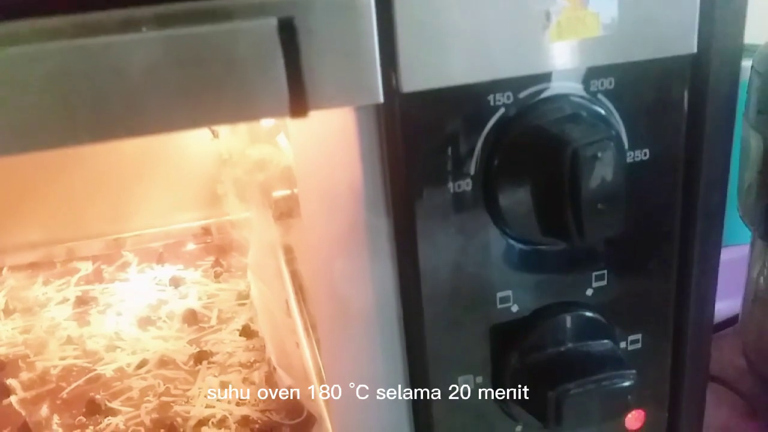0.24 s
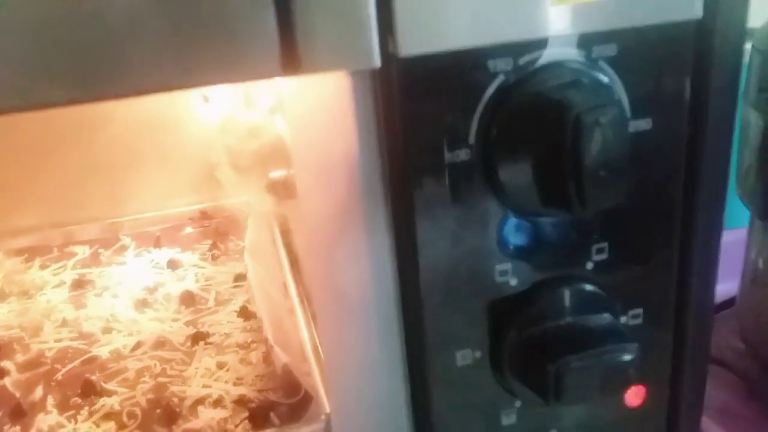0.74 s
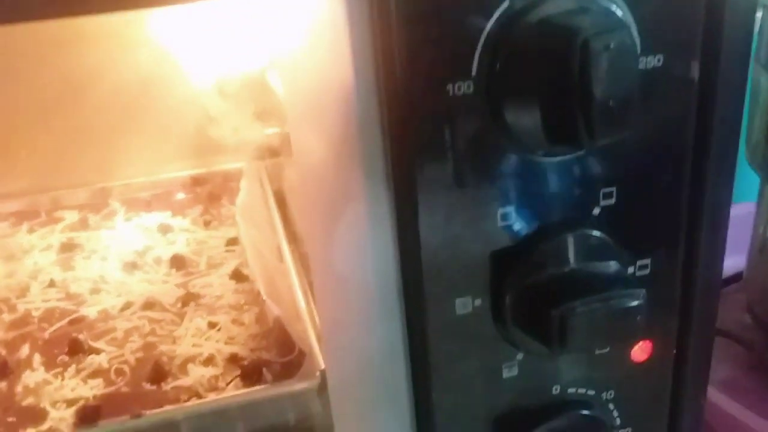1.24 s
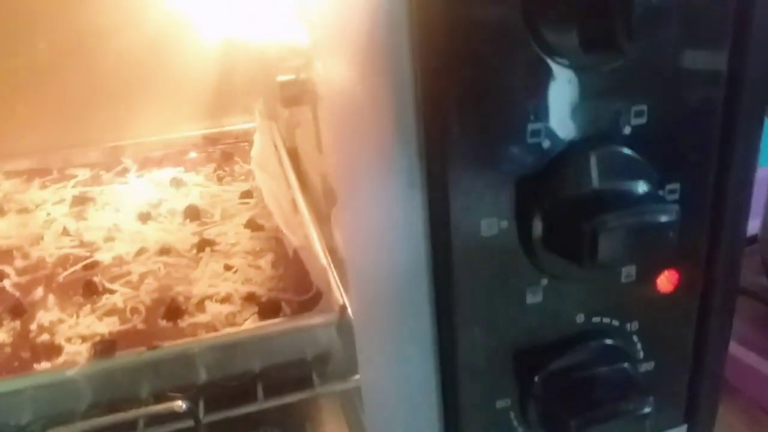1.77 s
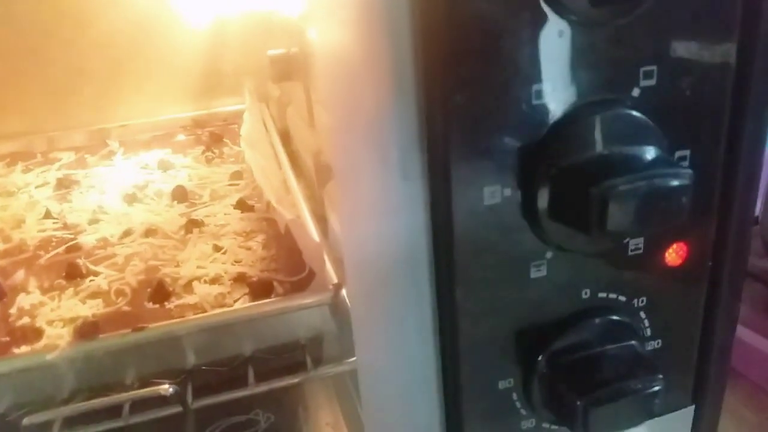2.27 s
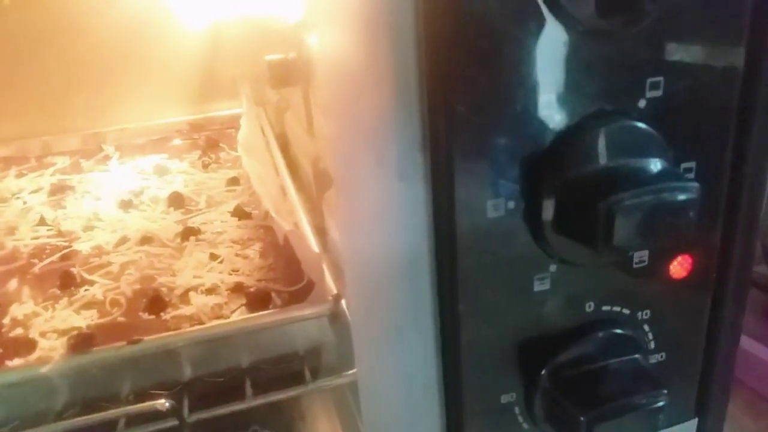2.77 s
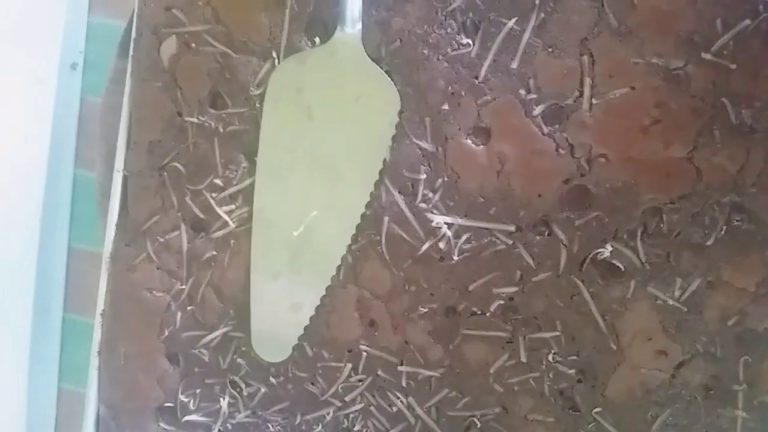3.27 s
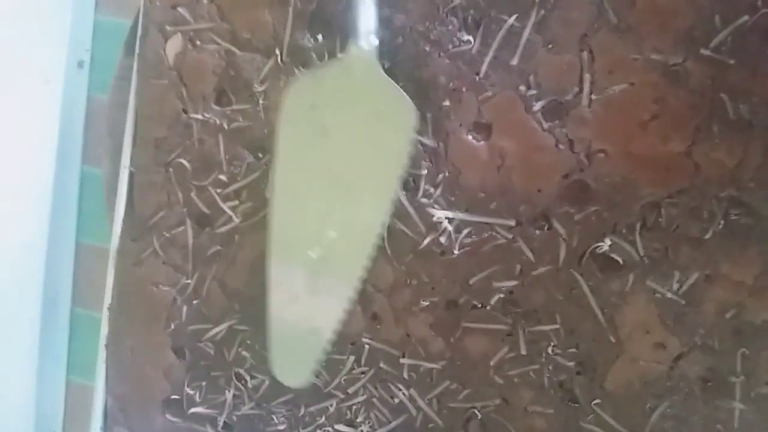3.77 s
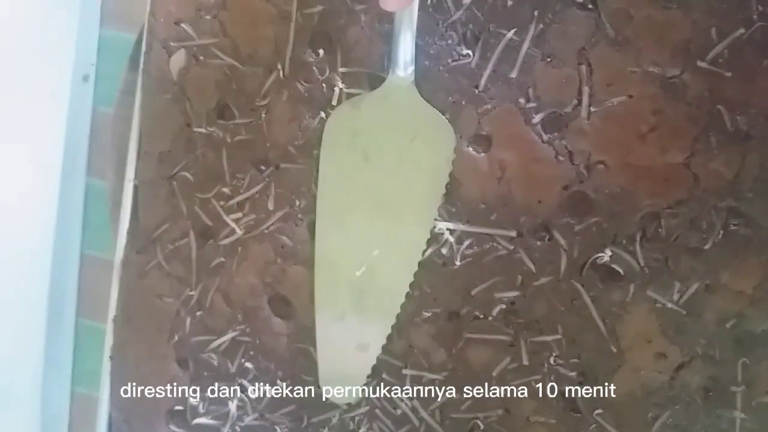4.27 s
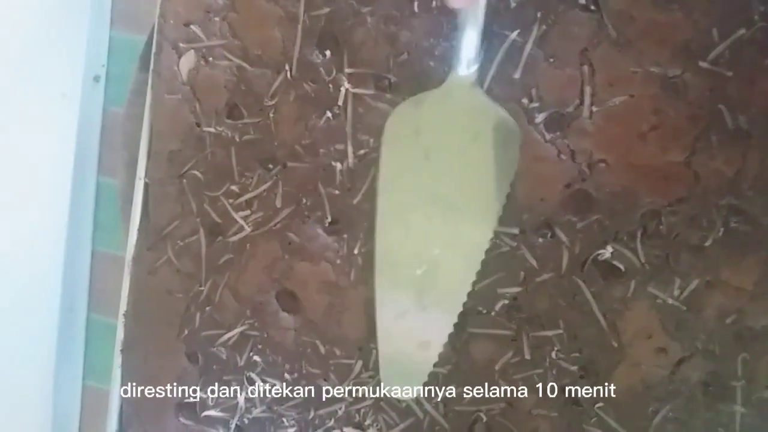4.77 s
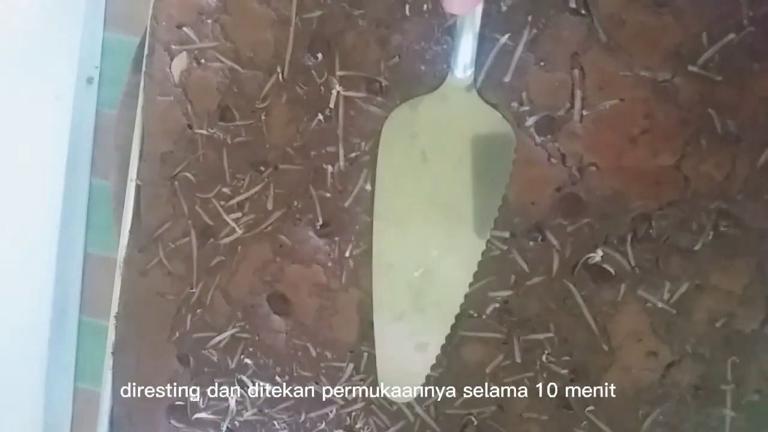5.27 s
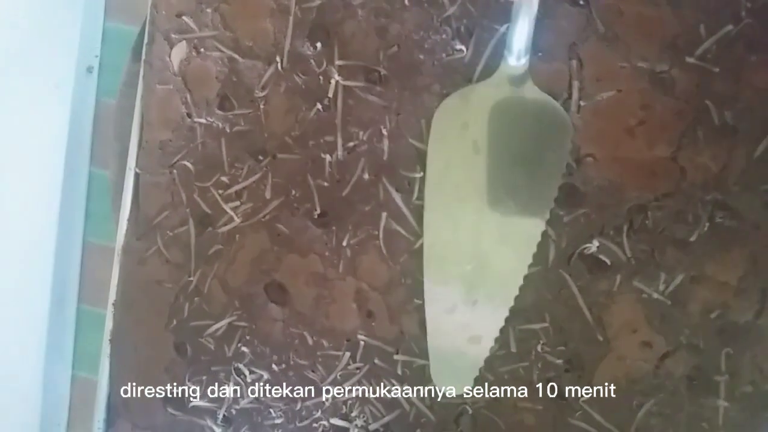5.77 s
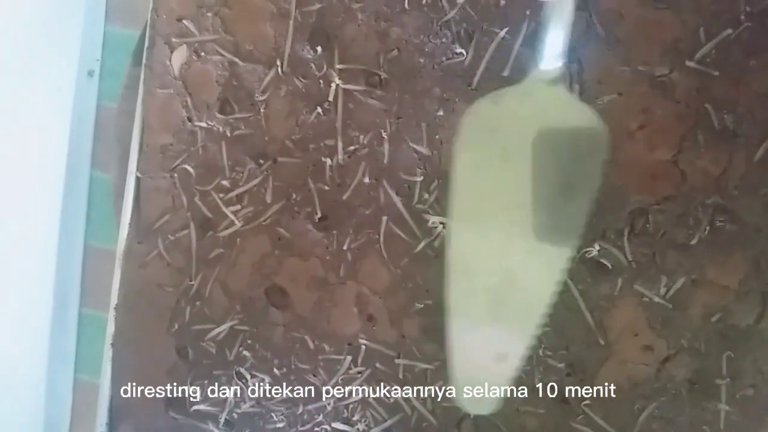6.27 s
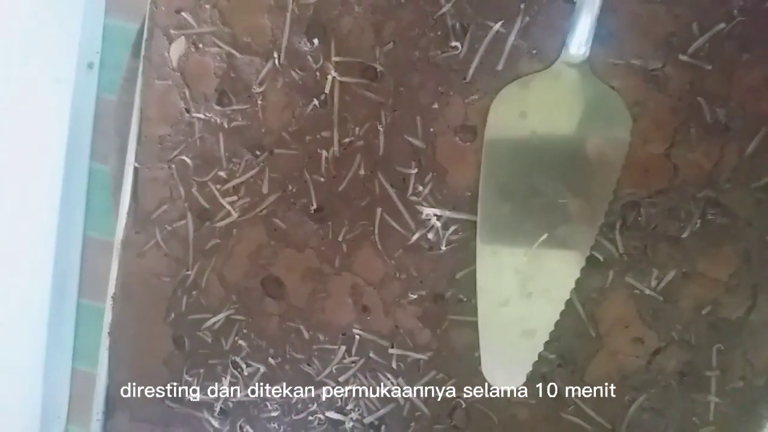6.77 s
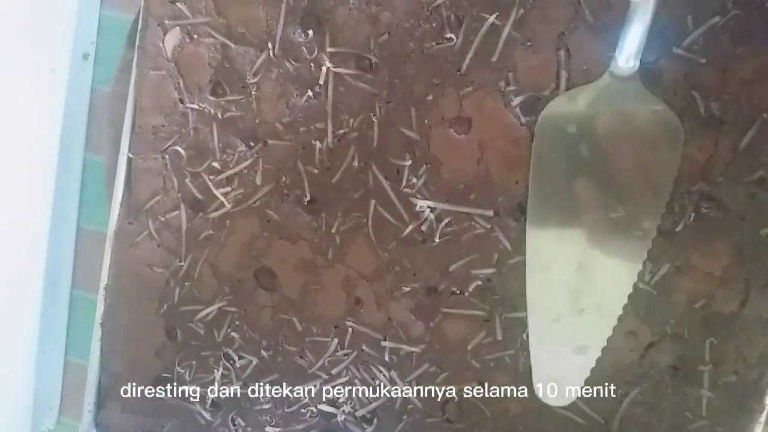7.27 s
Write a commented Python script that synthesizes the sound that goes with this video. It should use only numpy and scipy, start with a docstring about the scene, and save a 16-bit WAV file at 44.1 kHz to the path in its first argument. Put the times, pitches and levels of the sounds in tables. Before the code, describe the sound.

Quick mechanical ticking indoors cuts off, and a motorcycle chugs by, swelling and easing while a spatula faintly cracks a crust.

```python
"""A motorcycle idles far off, its low engine orders passing through the walls of a kitchen. A toaster oven's
clockwork timer ticks as its pallets strike and ring the metal; a hand rubs softly. Then the scene changes: a
single-cylinder motorcycle putters slowly past outside: exhaust pulses form a harmonic series that swells and
fades by interference between walls, over a clattering casing. While it passes, a plastic spatula pats a baked
dish and breaks the crust in tiny cracks."""
import sys
import numpy as np
from scipy import signal
from scipy.fft import rfft, irfft, next_fast_len
from scipy.io import wavfile
from scipy.ndimage import uniform_filter1d

SR = 44100
rng = np.random.default_rng(int(sys.argv[2]) if len(sys.argv) > 2 else 0)


def waveform_to_disk(signal):
    """Save audio, clipped to [-1, 1], as 16-bit WAV at the path in sys.argv[1]."""
    frames = np.transpose(np.atleast_2d(signal))
    scaled = np.clip(frames, -1, 1) * 32767
    samples = np.round(scaled).astype(np.int16)
    wavfile.write(sys.argv[1], SR, samples)


N = 332514
T = np.arange(N) / SR
PAUSE_FROM_S, PAUSE_TO_S = 2.892, 2.934


def undb(db):
    """Amplitude ratio of a level in decibels."""
    return np.exp(np.asarray(db) * np.log(10) / 20)


def unit(x):
    """Normalisation to rms 1."""
    return x / np.sqrt(np.mean(np.abs(x) ** 2))


def steady(x, size=8820):
    """Normalisation of the short-term rms to 1."""
    return x / np.sqrt(uniform_filter1d(x ** 2, size))


def curves(table):
    """Linear interpolation of each column of a time table at every sample."""
    times, *columns = np.transpose(table)
    return [np.interp(T, times, column) for column in columns]


def colour_db(points, hz):
    """Spectral envelope, interpolated on a log-frequency axis."""
    freqs, db = np.transpose(points)
    return np.interp(np.log(hz + 1), np.log(freqs), db)


def shape(x, gain):
    """Zero-phase filtering by a gain that is a function of frequency."""
    size = next_fast_len(len(x), True)
    freqs = np.arange(size // 2 + 1) * SR / size
    return irfft(rfft(x, size) * gain(freqs), size)[:len(x)]


def noise(points, size=N):
    """Gaussian noise of rms 1 under a spectral envelope of (freq_hz, level_db) points."""
    return unit(shape(rng.standard_normal(size), lambda f: undb(colour_db(points, f))))


def band(x, lo_hz, hi_hz, order=4):
    """Causal band-pass filtering."""
    edges_hz = [lo_hz, min(hi_hz, SR / 2 - 100)]
    return signal.sosfilt(signal.butter(order, edges_hz, "band", fs=SR, output="sos"), x)


def walk(rate_hz):
    """Smooth random modulation of spread 1."""
    steps = np.repeat(rng.standard_normal(int(rate_hz * N / SR) + 2), 4)
    smooth = unit(uniform_filter1d(steps, size=5))
    return np.interp((T * rate_hz + rng.random()) * 4, np.arange(len(smooth)), smooth)


def decay(t, t60):
    """Exponential damping by 60 dB in t60 seconds."""
    return np.exp(-np.log(1000) * t / t60)


def rise(t, tau_s):
    """Exponential approach to 1 with time constant tau_s."""
    return 1 - np.exp(-t / tau_s)


def add(out, start_s, x):
    """Superposition of a sound from start_s on."""
    i = int(start_s * SR)
    out[i:i + len(x)] += x[:N - i]


def room(x, wet_db, t60, size=24000):
    """Reverberation: the kitchen's diffuse field builds over the first reflections, then decays."""
    t = np.arange(size) / SR
    tail = rng.standard_normal(size) * decay(t, t60) * np.clip(t / 0.009, 0, 1)
    return x + undb(wet_db) * signal.oaconvolve(x, tail / np.linalg.norm(tail))[:N]


def kitchen():
    """Ambient noise: a steady background with most of its power in the bass."""
    # background spectrum: freq_hz, level_db
    spectrum = [(25, -21), (64, 5), (122, 7.5), (200, -19.5), (290, -19), (470, -21.5), (800, -21.5),
                (2500, -33), (4500, -22), (6500, -42), (10000, -36), (14000, -24)]
    return undb(-69) * noise(spectrum)


def idling(firing_hz=21.6, hum_hz=280):
    """Transmission loss: walls pass only the far engine's low orders, wavering hum and rumble."""
    # harmonics of the firing rate: order, level_db
    orders = [(3, -9.5), (4, -3), (6, 4), (7, -7.5), (8, -18), (9, -25)]
    # strength of the drone: time_s, level_db
    drone_levels = [(0.0, -75.5), (0.6, -69), (1.0, -72), (1.45, -74.5), (2.0, -64), (2.88, -65)]
    drone_db, = curves(drone_levels)
    tilt_db = 0.11 * (drone_db - drone_db.min())  # per order: the louder, the brighter
    turns = np.cumsum(firing_hz * (1 + 0.003 * walk(4.34))) / SR
    drone = np.zeros(N)
    for order, order_db in orders:
        gain = undb(drone_db + order_db + (order - 6) * tilt_db + 0.87 * walk(7.94))
        drone += gain * np.cos(2 * np.pi * (order * turns + rng.random()))
    hum_db = -75.5 + 2 * (drone_db - drone_db.max()) + 2 * walk(15)
    hum = undb(hum_db) * np.cos(2 * np.pi * (hum_hz * T + 0.15 * walk(7.4)))
    rumble = noise([(25, -33), (48, -18), (66, 3.5), (110, -5.5), (200, -15.5), (300, -18.5),
                    (450, -30), (2000, -70)])
    return drone + hum + undb(-66 + 0.47 * (drone_db - drone_db.mean())) * rumble


def escapement(first_tock_s=0.149, period_s=0.4776, tick_lag_s=0.2376):
    """Isochronous oscillation: an even swing times each contact (start_s, pallet, level_db, treble_db)."""
    # each pallet releases, slides and lands: pallet, lead_s, level_db, treble_db
    contacts = [(0, 0.031, -27, 7), (0, .0158, -14, 7), (0, 0.00043, 0, 0), (1, .0372, -15.5, 0),
                (1, .008, -19, 1), (1, 0, 0.5, 1.5)]
    # nearness of a listener moving along the oven: time_s, gain_db
    nearness = [(0.3, -3.5), (0.8, 0.5), (1.4, 0), (2.8, -0.4)]
    for swing_s in np.arange(first_tock_s, PAUSE_FROM_S, period_s):
        for pallet, lead_s, level_db, treble_db in contacts:
            start_s = swing_s + pallet * tick_lag_s - lead_s
            beat_db = -46.5 + np.interp(start_s, *np.transpose(nearness)) - 0.15 * rng.standard_normal()
            yield start_s, pallet, beat_db + level_db, treble_db


def timer(size=16384):
    """Impact excitation: two pallets hit the escape wheel in turn and ring movement, panel and spring."""
    # tock, then tick: chatter_t60_s, ring_db, body_db, room_db, panel_db
    pallets = [(0.054, 1, 0, -7, -16.5), (0.033, 1.5, -5, -9, -18)]
    # modes of the movement: pitch_hz, level_db, t60_s
    modes = [(3500, -27, 0.094), (3660, 1, 0.047), (4180, 2, 0.023), (4430, 1.5, 0.022), (5170, -12, 0.017),
             (5175, 1, 0.023), (6820, -4, 0.022), (7420, -0.5, 0.018), (8500, -13.5, 0.033),
             (10100, -12.5, 0.018)]
    # chatter of a landing pallet: freq_hz, level_db
    chatter_spectrum = [(600, -23), (2000, -24.5), (2800, -16.5), (3500, -3.5), (5200, 3), (6100, -7),
                        (8200, -6), (9500, -20), (15000, -24)]
    # close modes of the oven's sheet-metal panel: freq_hz, level_db
    panel_spectrum = [(900, -17), (2200, -12.5), (2750, -9.5), (3300, 1.5), (3900, -2.5), (4600, -26),
                      (6000, -21)]
    # the spring, which sings on between beats: freq_hz, level_db
    spring_spectrum = [(2800, -29), (3600, 0), (4300, -5), (4800, -9), (5250, 7), (5800, -18), (7500, -17),
                       (9000, -27)]
    tracks, t = np.zeros((2, N)), np.arange(size) / SR
    for start_s, pallet, level_db, treble_db in escapement():
        chatter_t60_s, ring_db, body_db, _, panel_db = pallets[pallet]
        ring = np.zeros(size)
        for pitch_hz, mode_db, t60_s in modes:
            envelope = undb(mode_db + 2.9 * rng.standard_normal()) * decay(t, t60_s)
            detuned_hz = pitch_hz * (1 + 0.016 * rng.standard_normal())
            ring += envelope * np.sin(2 * np.pi * (detuned_hz * t + rng.random()))
        chatter = noise(chatter_spectrum, size) * decay(t, chatter_t60_s)
        click = (unit(chatter) + undb(ring_db) * unit(ring)) * rise(t, 0.00039)
        # how squarely the pallet lands sets body and brightness
        tone = [(2900, body_db), (3700, -1.7), (4350, 2), (5200, 0.26), (7000, treble_db)]
        click = shape(click, lambda f: undb(colour_db(tone, f)))
        click /= np.sqrt(np.mean(click[:SR // 250] ** 2))  # rms 1 over the first 4 ms
        panel = undb(panel_db) * noise(panel_spectrum, size) * rise(t, 0.0056) * decay(t, 0.3)
        spring = undb(-21) * noise(spring_spectrum, size) * rise(t, 0.0066) * decay(t, 0.52)
        add(tracks[pallet], start_s, undb(level_db) * (click + panel + spring))
    return sum(room(track, room_db, t60=0.33) for track, (*_, room_db, _) in zip(tracks, pallets))


def rubs():
    """Friction noise: hand and spatula slide in short, grainy strokes that swell and die away."""
    # strokes: start_s, length_s, centre_hz, width_octaves, level_db
    strokes = [(0.755, 0.13, 1930, 1.9, -69), (1.768, 0.1, 2400, 1.8, -70.5),
               (3.57, 0.066, 4550, 0.79, -49), (6.725, .14, 7000, 1.6, -66),
               (6.868, 0.1, 2430, 0.12, -54.5), (6.886, 0.12, 985, 0.16, -55),
               (7.198, 0.066, 4430, 0.87, -55), (7.304, 0.075, 905, 0.46, -52),
               (7.321, 0.072, 8000, 1.2, -59), (7.331, 0.042, 5370, 0.16, -54.5)]
    out = np.zeros(N)
    for start_s, length_s, centre_hz, width_octaves, level_db in strokes:
        size = int(length_s * SR)
        grains = rng.standard_normal(size) * undb(1.5 * rng.standard_normal(size))
        slide = shape(grains, lambda f: np.exp(-(np.log2((f + 1) / centre_hz) / width_octaves) ** 2))
        envelope = np.sin(np.pi * np.linspace(0, 1, size) ** 0.82)
        add(out, start_s, undb(level_db) * unit(slide) * envelope)
    return out


def facing(coming_db, going_db, abreast_s=4.48, turn_s=0.093):
    """Directivity: a part's level shifts as the motorcycle turns from front view to rear view."""
    return coming_db + (going_db - coming_db) * (1 + np.tanh((T - abreast_s) / turn_s)) / 2


def fading(order):
    """Destructive interference: an order's gain dips where a wall echo meets it in opposite phase."""
    # cancellations: centre_s, order, half_length_s, depth_db
    fades = [(3.41, 5, 0.46, -20), (4.608, 4, 0.49, -24), (4.93, 5, 0.53, -10), (5.43, 6, 0.38, -35),
             (5.413, 5, 0.074, -18), (5.56, 3, 0.34, -16), (6.005, 4, 0.64, -31), (6.924, 6, 0.07, -23),
             (7.29, 6, 0.61, -17), (7.476, 5, 0.35, -24)]
    gain = np.ones(N)
    for centre_s, faded_order, half_length_s, depth_db in fades:
        if faded_order == order:
            t = T - centre_s
            gain *= np.hypot(t, undb(depth_db) * half_length_s) / np.hypot(t, half_length_s)
    return gain


def flare(x):
    """Constructive interference: reflections add in phase for a moment and lift one band."""
    # reinforcements: centre_s, half_length_s, centre_hz, half_width_hz, gain_db
    flares = [(4.02, .2, 342, 9.5, 9.5), (4.08, .19, 302, 9.2, 11), (4.235, 0.098, 193, 15, 11),
              (4.442, 0.13, 230, 25, 13), (5.117, 0.12, 254.5, 10, 10), (5.267, 0.18, 473.4, 15.5, 16),
              (5.77, 0.27, 228.5, 11, 17), (6.0, .14, 468, 32, 7.5), (7.244, 0.24, 203.4, 5.9, 11),
              (4.225, 0.11, 1820, 210, 8), (4.613, 0.045, 4100, 300, 5), (4.803, 0.086, 3400, 390, 5.5)]
    out = x.copy()
    for centre_s, half_length_s, centre_hz, half_width_hz, gain_db in flares:
        near = np.abs(T - centre_s) < 2 * half_length_s
        lifted = shape(x[near], lambda f: np.exp(-((f - centre_hz) / half_width_hz) ** 2))
        window = np.exp(-((T[near] - centre_s) / half_length_s) ** 2)
        out[near] += (undb(gain_db) - 1) * window * lifted
    return out


def exhaust(cycles, exhaust_db, rasp_db):
    """Periodic pulses: one puff per firing sends a harmonic series and gas noise down the silencer."""
    # strong low harmonics: order, coming_db, going_db
    boom = [(3, -58, -34), (4, -33.5, -28.5), (5, -27, -26.5), (6, -31, -25.5)]
    # envelope of the upper harmonics and gas noise: freq_hz, level_db
    spectrum = [(88, -44), (150, -15), (178, -5), (337, -11.5), (366, -26), (416, -18.5), (652, -36.5),
                (900, -49), (1170, -64), (1980, -120)]
    crank = undb(facing(-60.5, -50.5)) * np.cos(4 * np.pi * cycles)
    rumble = noise([(20, -26), (45, -14), (80, 7), (130, 8), (180, -22), (300, -12), (1000, -90)])
    out = undb(0.45 * exhaust_db) * (crank + undb(facing(-48.5, -44.5)) * rumble)
    for order, coming_db, going_db in boom:
        phase = -np.arctan((order - 4.8) / 5.1)  # shift through the silencer's resonance
        level_db = exhaust_db + facing(coming_db, going_db) + 0.93 * walk(22.13)
        out += np.sqrt(2) * undb(level_db) * fading(order) * np.cos(2 * np.pi * order * cycles + phase)
    upper = np.zeros(N)
    for order in range(7, 29):  # each fades and drifts as the wall paths change
        gain = undb(colour_db(spectrum, 24.93 * order)) * (1 + 0.53 * walk(3.5))
        upper += gain * np.cos(2 * np.pi * (order * cycles + 0.26 * walk(2.5)))
    upper = flare(unit(upper))
    # gas rushes hardest just after the exhaust valve opens
    gas = unit(noise(spectrum) * (0.5 + np.exp(-(cycles % 1) / 0.5)))
    bark = (160.6, 361, exhaust_db + facing(-33, -34), -10)
    rasp = (367.7, 643, rasp_db + facing(-40.5, -43), -3)
    for lo_hz, hi_hz, level_db, gas_db in (bark, rasp):
        blend = unit(band(upper, lo_hz, hi_hz)) + undb(gas_db) * unit(band(gas, lo_hz, hi_hz))
        out += undb(level_db) * steady(blend)
    return out


def machinery(cycles, level_db):
    """Forced vibration: dense impacts of valves, chain and tyres throb with the crank and ring the casing."""
    # impact noise: freq_hz, level_db
    spectrum = [(350, -25), (600, 14.5), (716, 4), (1470, -5), (1910, -10), (2160, -10), (2500, -9.5),
                (4090, -8.5), (5360, -20), (8180, -28.5), (15500, -34)]
    # casing resonances: centre_hz, width_hz, gain_db
    casing = [(850, 16, 3.5), (1604, 8.8, 8.5), (1725, 28, 9.5), (1920, 82, 11.5), (2482, 134, 6.5),
              (3142, 60, 9.5), (4070, 430, 4), (6320, 180, 4), (8120, 500, 5)]
    impacts = rng.standard_normal(N) * undb(walk(700) + 0.58 * walk(25))
    throb = 1 + 0.045 * np.cos(2 * np.pi * cycles) + 0.027 * np.cos(4 * np.pi * cycles)
    drive = shape(impacts * throb, lambda f: undb(colour_db(spectrum, f)))
    panels = np.zeros(N)
    for centre_hz, width_hz, gain_db in casing:
        resonance = band(drive, centre_hz - width_hz / 2, centre_hz + width_hz / 2, order=1)
        panels += (undb(gain_db + 2 * walk(9)) - 1) * resonance  # each panel rattles unevenly
    radiated = flare(drive + panels)
    clatter = undb(facing(-48.5, -51.5)) * steady(band(radiated, 742, 2280))
    hiss = undb(facing(-52.5, -52)) * steady(band(radiated, 2400, 6020))
    sizzle = undb(facing(-56, -58)) * unit(band(radiated, 6420, 17900))
    return undb(level_db) * (clatter + hiss + sizzle)


def motorcycle():
    """A moving source: exhaust and machinery share one firing cycle, growing and fading as they pass."""
    # engine speed: time_s, firing_hz
    speed = [(2.94, 22.02), (3.34, 23.19), (3.76, 23.23), (4.0, 24.55), (4.3, 24.5), (5.15, 25.81),
             (5.47, 25.04), (6.08, 24.97), (6.28, 24.51), (6.54, 25.13), (6.78, 24.74), (7.05, 25.72),
             (7.54, 26.63)]
    # levels along the way: time_s, exhaust_db, rasp_db, mechanical_db
    pass_levels = [(2.94, -23.5, -24, -22.5), (3.15, -12.5, -13, -13.5), (3.45, -7.5, -8.5, -8.5),
                   (3.78, -8.5, -8, -2.5), (3.96, -2.6, -1.5, -1.5), (4.45, 0.5, 0.2, 0.6),
                   (4.85, -3, 1.5, -1.5), (5.0, -3.6, 0, -6.5), (5.42, -8.5, -4.5, -8.5),
                   (5.8, -5, -6, -11.5), (6.28, -8, -10, -4.5), (6.5, -9, -10, -5.5),
                   (6.8, -6.5, -8.5, -4.5), (7.2, -9, -11.5, -5.5), (7.54, -11, -12.5, -4.5)]
    firing_hz, = curves(speed)
    cycles = np.cumsum(firing_hz * (T > PAUSE_TO_S)) / SR - 0.01
    exhaust_db, rasp_db, mechanical_db = curves(pass_levels)
    return exhaust(cycles, exhaust_db, rasp_db) + machinery(cycles, mechanical_db)


def crust(ping_hz=5280, t60_s=0.011, size=2048):
    """Brittle fracture: the crust gives way in tiny dry cracks that make the spatula's blade ping."""
    # fractures: start_s, relative_db
    cracks = [(3.581, -44), (6.7314, -32), (6.758, -20), (6.7744, -36), (6.7967, -31), (6.8027, -27.5),
              (7.0489, -33), (7.3297, -30)]
    out, t = np.zeros(N), np.arange(size) / SR
    ping = undb(-5.5) * np.sin(2 * np.pi * ping_hz * t)
    envelope = rise(t, 0.00049) * decay(t, t60_s)
    for start_s, relative_db in cracks:
        crack = noise([(500, -1), (2000, -0.5), (6000, -4), (11000, -3), (15000, -11)], size)
        add(out, start_s, undb(relative_db - 8.5) * (crack + ping) * envelope)
    return room(out, wet_db=-8, t60=0.25)


def scene(fade_in_s=0.006):
    """Superposition: far engine and timer, then after a brief gap the scene changes to the motorcycle and the
    dish."""
    hiss = undb(-76) * noise([(300, -2.5), (1500, -4), (5000, -2), (10000, -8), (15000, -7)])
    before = (kitchen() + idling() + timer() + hiss) * (T < PAUSE_FROM_S)
    after = (motorcycle() + crust() + hiss) * np.clip((T - PAUSE_TO_S) / fade_in_s, 0, 1)
    return (before + rubs() + after)[None]


def record(dry, cutoff_hz=15700):
    """Band limiting: a steep low-pass removes the highest treble."""
    return signal.sosfilt(signal.ellip(10, 0.1, 80, cutoff_hz, fs=SR, output="sos"), dry)


dry = scene()
out = record(dry)
waveform_to_disk(out)
```